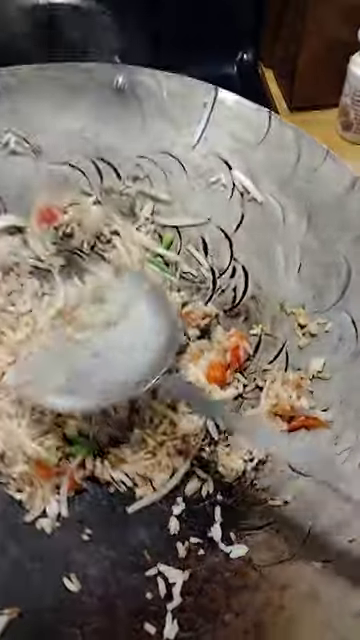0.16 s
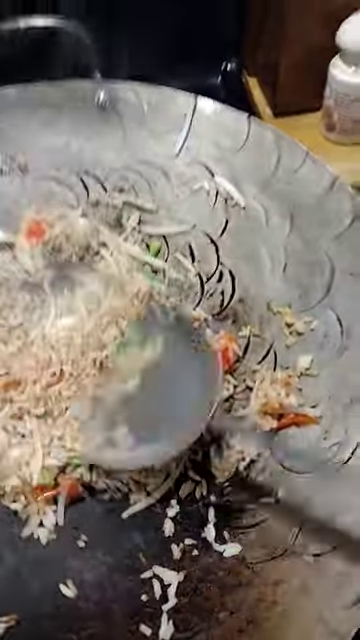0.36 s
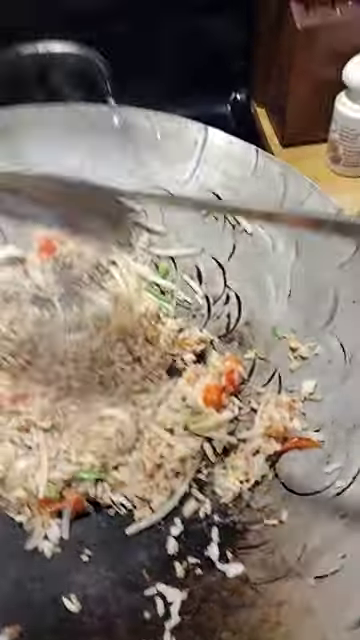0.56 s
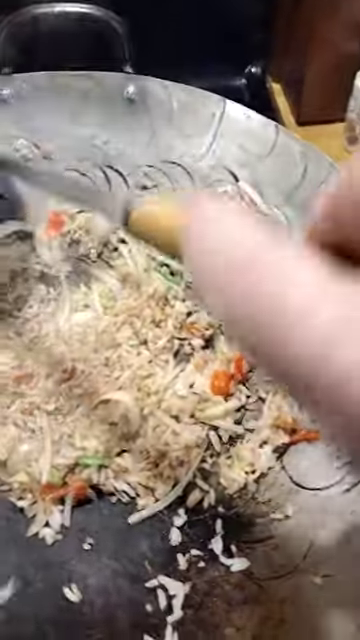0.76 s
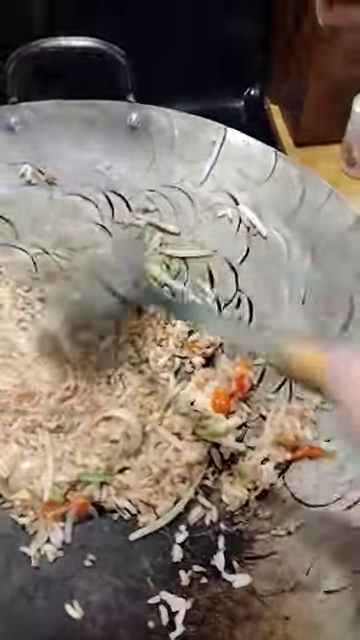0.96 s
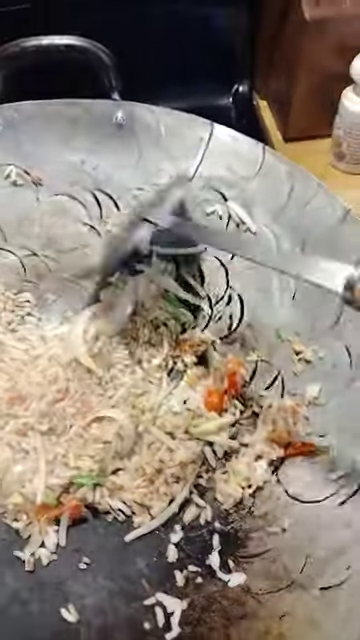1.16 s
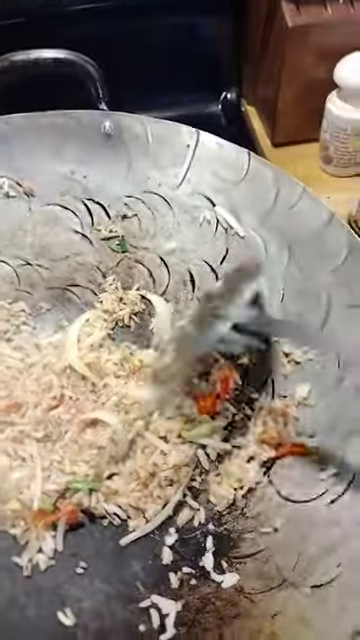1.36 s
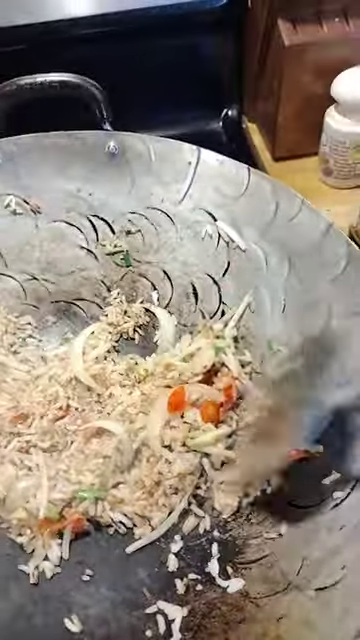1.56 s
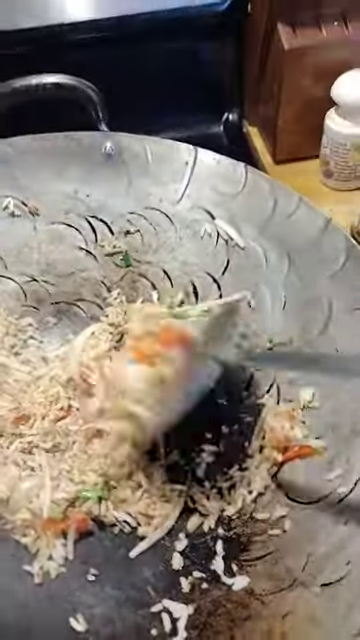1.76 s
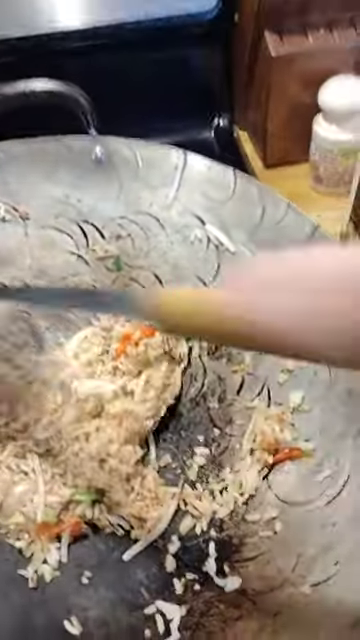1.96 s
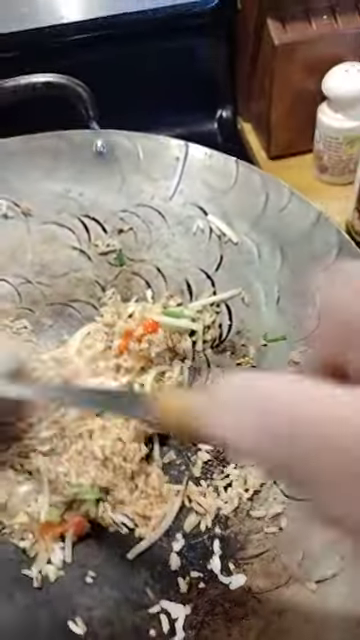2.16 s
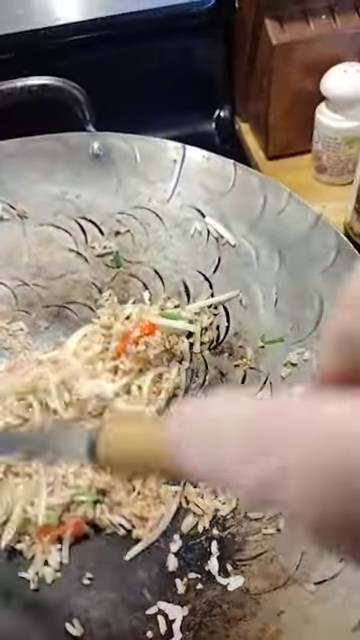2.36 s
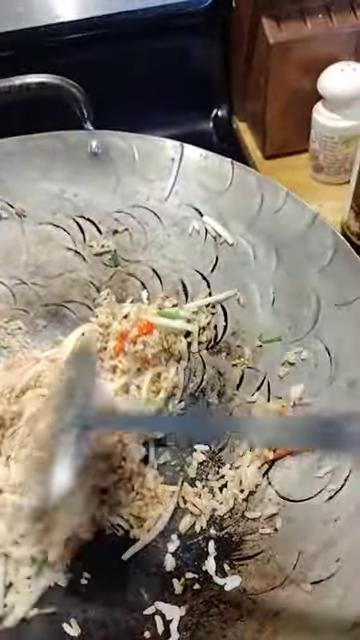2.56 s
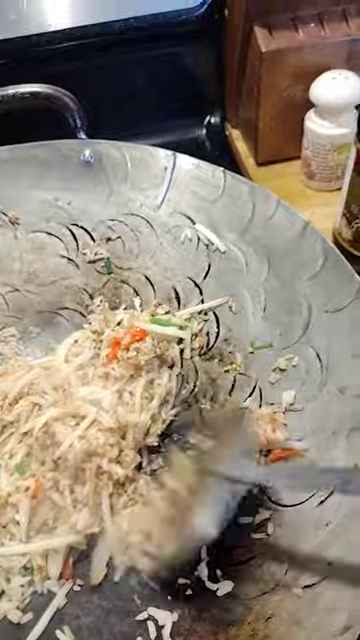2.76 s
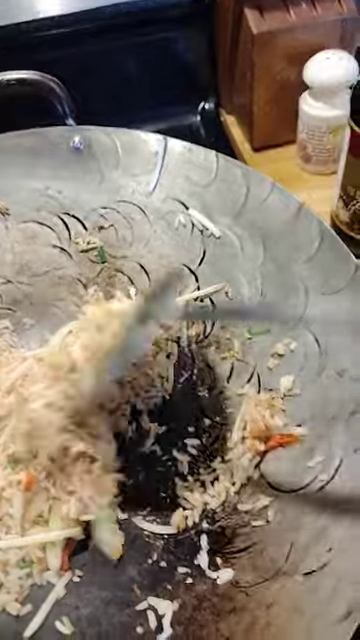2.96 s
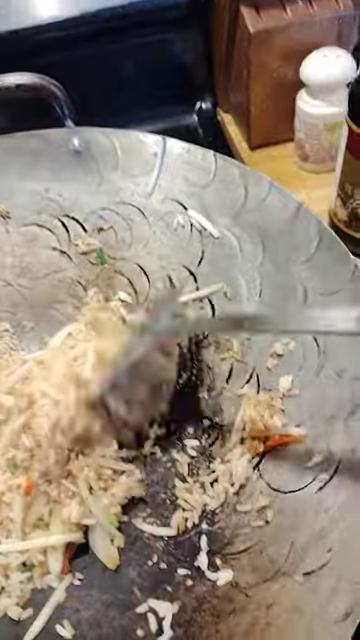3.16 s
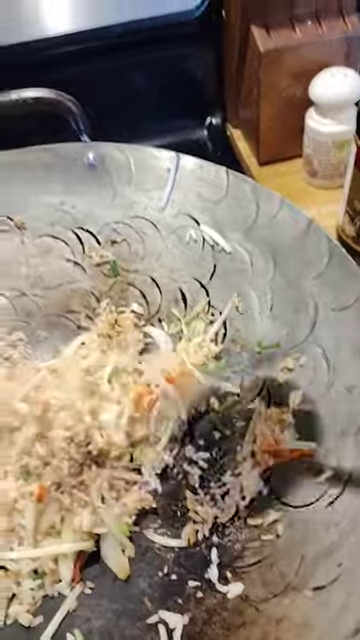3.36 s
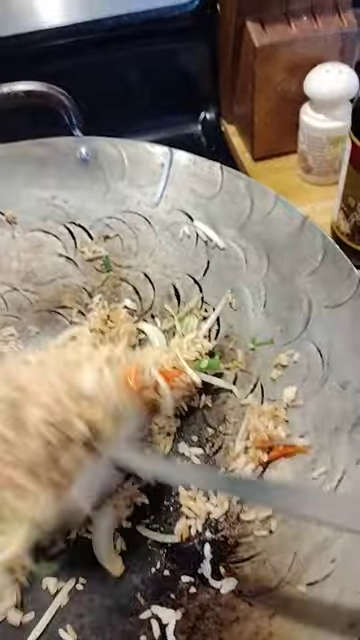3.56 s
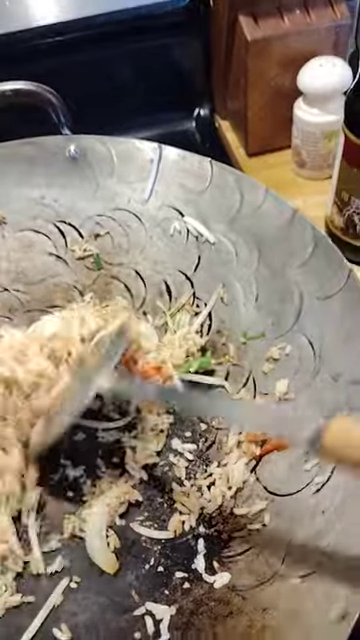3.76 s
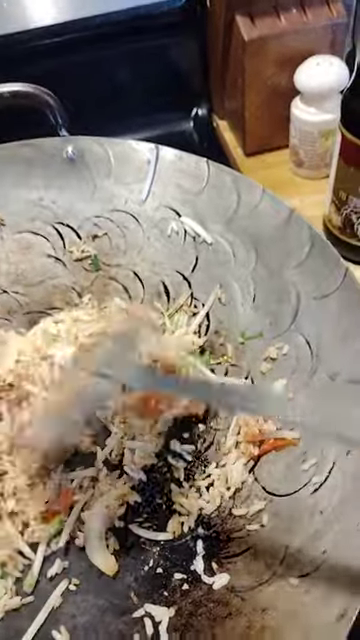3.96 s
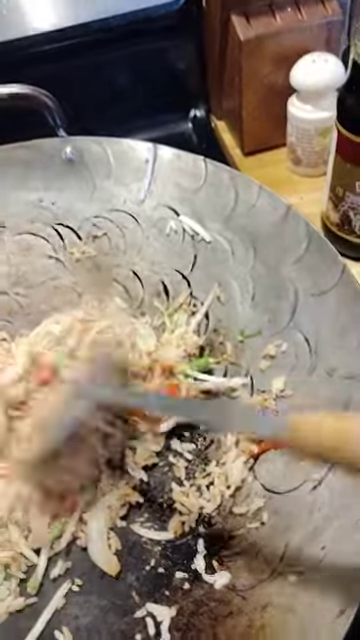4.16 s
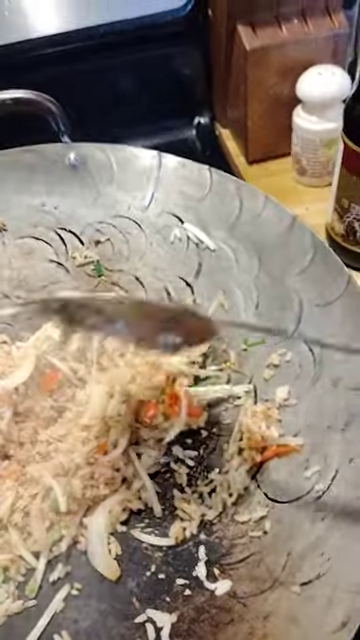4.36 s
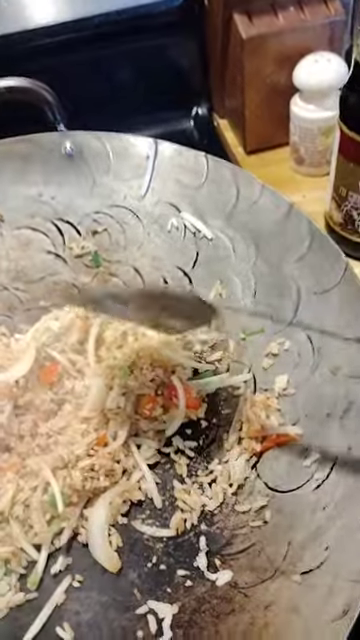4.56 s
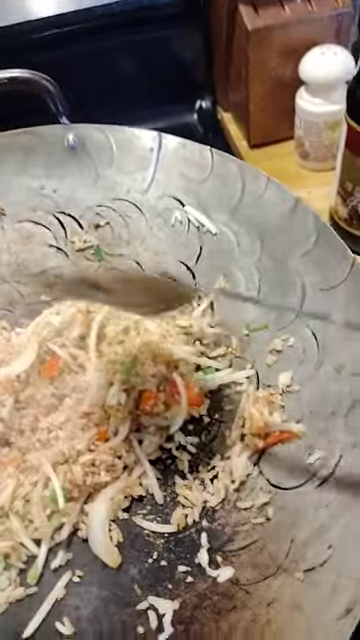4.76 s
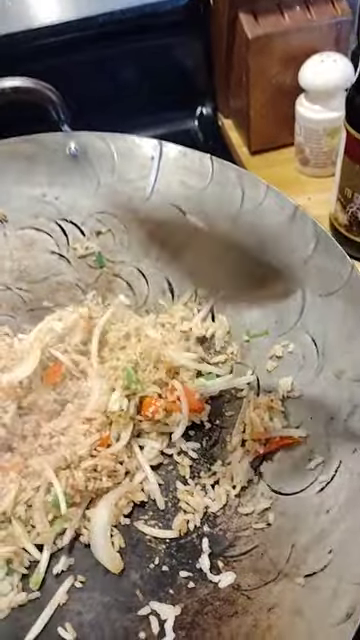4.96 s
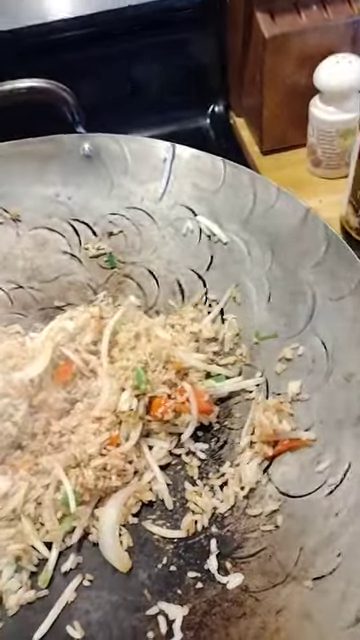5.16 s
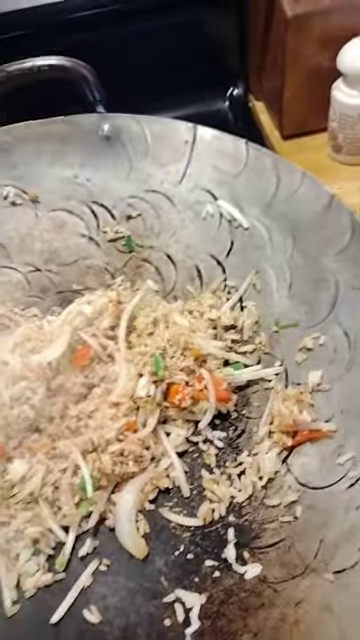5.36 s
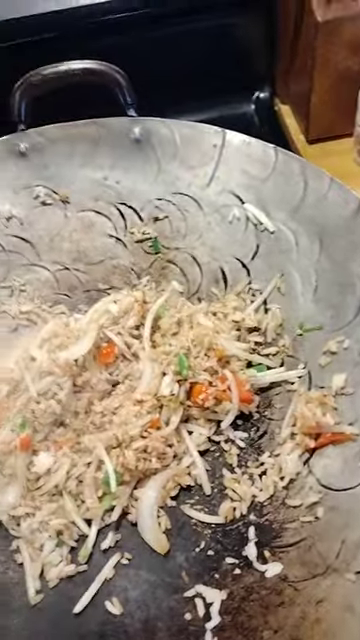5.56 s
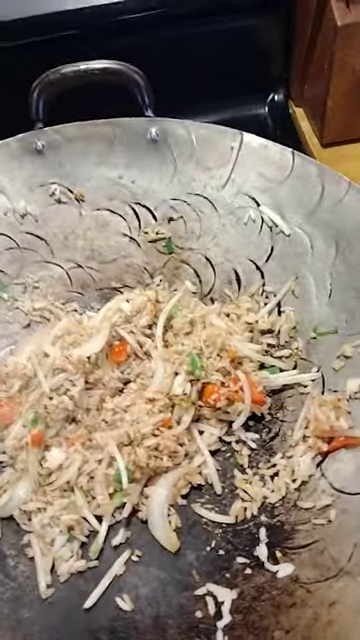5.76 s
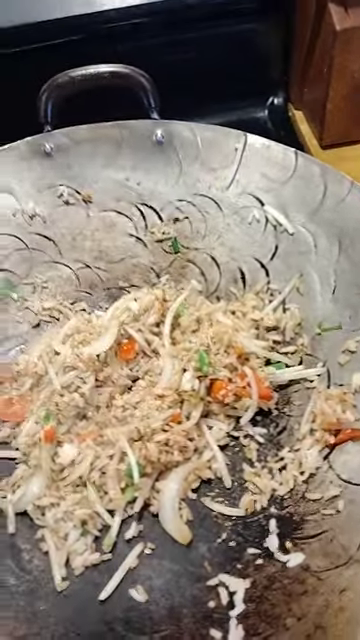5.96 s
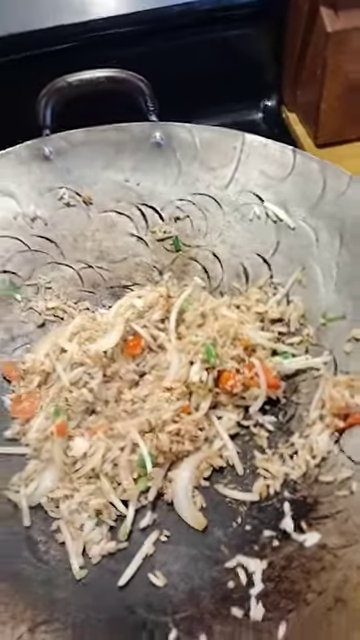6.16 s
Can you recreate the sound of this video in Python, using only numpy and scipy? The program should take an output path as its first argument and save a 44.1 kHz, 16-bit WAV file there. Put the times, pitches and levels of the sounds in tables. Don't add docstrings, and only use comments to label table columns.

```python
import sys
import numpy as np
from scipy import signal
from scipy.fft import rfft, irfft
from scipy.io import wavfile

SR = 44100
rng = np.random.default_rng(int(sys.argv[2]) if len(sys.argv) > 2 else 0)


def materialize(psi):
    bounded = np.clip(np.atleast_2d(psi).T, -1, 1)
    quanta = np.round(bounded * 32767).astype(np.int16)
    wavfile.write(sys.argv[1], SR, quanta)


def decibels_to_gain(level_db):
    exponent = np.asarray(level_db, float) / 20
    return 10 ** exponent


N = 277827

# (frequency [Hz], likeness [0-1])
PORT_LIKENESS = [(60, 0.93), (300, 0.96), (700, 0.2), (1400, 0.31), (2500, 0.13), (5000, 0), (15000, 0.061)]
# (time [s], fat left over right [dB], steel left over right [dB])
LEANS = [(0.0, -3.5, 3), (1.4, -4.5, 1.5), (2.65, -4, 4.5), (2.84, -4, 3), (4.3, -5.5, 1.5),
         (5.14, -2.5, 1.5), (5.53, -2, 13), (6.3, -8, 23)]
# (frequency [Hz], density [dB per Hz])
AIR_COLOUR = [(26, -43), (45, -20.5), (113, -9.5), (173, -13), (246, -6.5), (322, -13), (356, -12.5),
              (387, -16.5), (428, -14), (745, -25.5), (959, -26), (1060, -30), (2500, -31), (3250, -24.5),
              (5500, -120)]
# (frequency [Hz], width [Hz], level [dB])
HUM_MODES = [(114, 25, 3), (232, 22, -8.5)]
# (time [s], level [dB])
DRAUGHT = [(0, -39.5), (.6, -39.5), (1.9, -35.5), (4.4, -41), (4.7, -33.5), (5.05, -32.5), (5.58, -39),
           (5.98, -31), (6.3, -36.5)]
# (time [s], level [dB])
MOTOR = [(0, -33.5), (.6, -45.5), (2.1, -44), (3.0, -43), (3.4, -39), (4.44, -56), (4.67, -34),
         (5.05, -25.5), (5.3, -28), (5.6, -30.5), (6.3, -31.5)]
# (time [s], level [dB])
HEAT = [(0, -35), (.3, -25.5), (.6, -32), (.9, -31), (1.25, -29), (1.6, -30), (1.9, -28), (2.06, -33.5),
        (2.12, -36), (2.45, -30), (3.1, -31), (3.35, -30), (3.56, -38), (4.5, -34.5), (5.2, -35.5),
        (5.3, -42.5), (5.68, -48.5), (6.3, -56.5)]
# (peak time [s], rise [s], fall [s], fat [dB], steam [dB])
FLARES = [(.096, 0.092, 0.093, -19, -17), (.335, 0.0098, 0.073, -24, -17.5), (1.05, 0.066, 0.1, -20, -23.5),
          (1.383, 0.047, 0.053, -24, -22), (2.253, 0.07, 0.15, -24, -26), (2.495, .02, 0.28, -29, -32.5),
          (2.83, 0.0097, 0.14, -36, -33.5), (3.215, 0.026, .15, -42, -46), (3.62, 0.024, 0.35, -25, -28),
          (3.88, 0.069, 0.39, -23, -25.5), (4.196, 0.033, 0.21, -22, -23.5),
          (4.535, 0.026, 0.016, -29, -44), (4.71, 0.038, 0.025, -32.5, -33),
          (4.905, 0.029, 0.028, -26.5, -46)]
# (frequency [Hz], density [dB per Hz])
FIZZ_COLOUR = [(1500, -24), (2400, -12), (2900, -0.5), (3200, -2.5), (3600, -0.5), (4300, 0.5), (6000, 0.5),
               (9000, -1), (12000, -3.5), (15400, -1), (15900, -36)]
# (frequency [Hz], width [Hz], level [dB])
BOWL_AIR = [(2180, 485, 10), (2610, 950, 4.5), (1920, 160, 1.5)]
# (peak time [s], rise [s], fall [s], edge [dB], wok rumble [dB])
DRAGS = [(.096, 0.15, 0.14, -20.5, -32.5), (.335, 0.0083, 0.081, -21.5, -34), (.955, 0.03, 0.088, -31, -26),
         (1.04, 0.077, 0.073, -22, -49), (1.32, 0.052, 0.041, -20.5, -33), (1.384, 0.029, 0.039, -9.5, -31),
         (1.605, .03, .02, -39, -46), (1.71, 0.012, 0.066, -19.5, -35), (1.8, .1, 0.1, -33, -44.5),
         (2.165, 0.026, 0.057, -40, -30), (2.215, .02, 0.028, -18.5, -44), (2.27, .06, 0.1, -25, -43),
         (2.495, 0.013, 0.089, -20.5, -41), (2.832, 0.01, .08, -20.5, -45),
         (3.188, .02, 0.0092, -27.5, -45), (3.215, .02, 0.029, -21.5, -40), (3.33, .08, 0.08, -32, -46),
         (3.62, 0.017, 0.47, -39, -39.5), (3.88, 0.055, 0.5, -27, -39), (4.196, 0.037, 0.22, -24, -35.5),
         (4.535, 0.046, 0.099, -26, -35), (4.71, 0.076, 0.15, -26, -35),
         (4.905, 0.023, 0.093, -21.5, -29.5), (5.0, .05, 0.26, -35, -45)]
# (frequency [Hz], density [dB per Hz])
EDGE_RASP = [(2000, -50), (3150, -28), (3420, -2), (3750, 0), (4400, -1), (4900, -10), (5800, -16),
             (8000, -22), (12000, -40)]
# (frequency [Hz], density [dB per Hz])
WOK_RASP = [(150, -35), (300, -12), (450, -5), (650, -4), (900, 0), (1300, -1), (1600, -3), (2000, -9),
            (2600, -28), (4000, -60)]
# (frequency [Hz], width [Hz], level [dB])
LADLE_MODES = [(3080, 60, -16), (3490, 30, -3), (3565, 25, -6), (3640, 20, 0), (3740, 25, 0),
               (3890, 25, -2), (4000, 25, 2), (4100, 25, -4), (4340, 30, -4), (4400, 25, -2),
               (4800, 40, -8), (5130, 20, -3), (5480, 25, -7), (5850, 25, -6), (6100, 60, -14),
               (6460, 20, -9), (6780, 30, -12), (7260, 30, -16), (7730, 30, -16), (8220, 50, -14),
               (8700, 30, -16)]
# (frequency [Hz], width [Hz], level [dB])
WOK_MODES = [(436, 40, -6), (575, 30, -7), (660, 30, -6), (821, 40, -1), (930, 25, 0), (1118, 25, -3),
             (1300, 20, -1), (1480, 30, -3), (1690, 30, -5), (1900, 50, -5), (2180, 60, -3)]
# (time [s], lift of the upper half of the ladle's band and equal drop of the
# lower [dB], high modes [dB])
LIP = [(0, 0, -7), (.92, 0, -3), (.99, -1, -5), (1.04, 2, 9), (1.27, 6, -2), (1.33, -2, -2),
       (1.38, -2.5, 2), (1.62, 1.5, -6), (1.72, -2.5, 3), (2.14, -1.5, -6), (2.22, 0.5, 2), (2.47, 4.5, -2),
       (2.83, -3.5, -9), (3.19, 2, -4), (3.9, 1, 0), (4.51, -4, 5), (4.67, 0.5, 0), (4.88, -2, 8),
       (5.1, 1, -2)]
# (time [s], peak [dB], low part [dB], left over right [dB])
POPS = [(0.198, -10, -9, -3), (0.2153, -20, -5, -5.5), (0.331, -15, 9, -15), (0.519, -27, -9, -1),
        (0.548, -33, -12, -3), (0.562, -28, -15, -5), (0.796, -13, -11, -9), (0.806, -20, 5, -3),
        (0.824, -20, -3, -4), (0.8967, -25, 2, -3.5), (1.4118, -17, -8, 5), (1.996, -18, -8, -7),
        (2.0108, -11, -8, -6), (2.2047, -21, -9, -2), (2.978, -23, 7, 0), (2.593, -16.5, 10.5, 6),
        (3.4183, -9, -36, -6), (3.551, -14, -20, -10), (3.607, -17, -6, 3), (4.067, -16, 3, -5),
        (4.153, -24, 17, -14.5), (5.029, -13, -12, -9), (5.273, -14.5, -5, 0), (5.301, -25, 6, -16),
        (5.535, -25.5, 4, -9), (5.613, -36, 2, -4), (5.6334, -37, 12, -3), (5.6929, -18, -2, -8),
        (5.99, -22, 8, -3), (6.1544, -45, -11, -2), (6.2241, -28, 8, -2), (6.252, -29, 1, 3)]
# (time [s], level [dB], pitch [Hz], length [cycles])
CHIMES = [(0.925, -1, 1500, 0.83), (0.929, -8, 3730, 23), (0.989, -17, 3860, 25), (1.345, -30.5, 592, 16),
          (1.6212, -6, 3800, 1.6), (1.72, -27, 418, 7.1), (2.146, -13, 3940, 14), (2.189, -21.5, 445, 5.8),
          (2.472, -11, 1310, 1.2), (3.197, -15, 2180, 22), (4.506, -17, 677, 2), (4.545, -26, 860, 5),
          (4.66, -10, 650, 0.76), (4.857, -31, 930, 9.9), (4.874, -7, 666.7, 0.68), (4.93, -21, 510, 7),
          (5.757, -17, 1670, 5), (5.758, -25, 155, 7.1), (5.76, -30, 3080, 18), (5.762, -24, 294, 4.8),
          (7.1, -18, 1680, 4), (5.822, -30, 1700, 20), (5.832, -24, 3080, 17), (5.9325, -10, 1500, 1.2),
          (5.936, -31.5, 3010, 23), (5.938, -26, 545, 9), (5.958, -24, 1120, 2.5), (5.981, -20, 1300, 1.5),
          (5.99, -17, 1800, 1.2), (5.992, -23, 487, 6), (6.0, -14, 1110, 2.5), (6.01, -22.5, 155, 3.6),
          (6.012, -18, 436, 14.5), (6.013, -18, 2200, 9.2), (6.021, -21, 1400, 1.5),
          (6.036, -18.5, 525, 7.7), (6.037, -15, 1100, 2.5), (6.055, -25, 1120, 3.5),
          (6.095, -20, 1110, 7.1), (6.12, -27, 690, 5)]
# (time [s], thud [dB], thud pitch [Hz], ladle ring [dB], crack over the ring [dB])
KNOCKS = [(0.926, 0, 870, -2, -19), (0.987, 5.5, 1970, -7.5, -18), (1.271, 7, 1840, -6.5, -3),
          (1.6206, 7.5, 2040, -4.5, -5), (2.1419, -5, 434, -8, -21), (2.147, -4.5, 810, -11, -14),
          (2.213, -24, 2160, -18.5, 0), (2.471, 2, 1960, -2, -8.5), (3.192, 6.5, 2070, -5.5, -5.5),
          (4.511, -9, 676, -3.5, -7), (4.666, -7, 666, -4.5, -3.5), (4.694, -8, 660, -10, -9),
          (4.879, -5.5, 770, -3, -6)]
# (frequency [Hz], density [dB per Hz])
CRACK_COLOUR = [(880, -67), (1500, -20), (2190, -1.5), (2860, -11), (4040, 5.5), (5170, -6), (6630, -1.5),
                (9470, -10), (16000, -13)]
# (time [s], peak [dB], pitch [Hz], low boom [dB], t60 [s])
BOUNCES = [(5.744, -25, 433, -8, 0.047), (5.7559, -11.5, 2220, -3, 0.047), (5.775, -31, 265, -16, 0.05),
           (5.8, -14.5, 2190, -10, 0.048), (5.826, -21.5, 1650, -1, 0.066),
           (5.9332, -12.5, 560, -20, 0.063), (5.976, -12.5, 946, -7, 0.064), (5.989, -23, 523, -3, 0.096),
           (6.002, -36, 428, 16, 0.045), (6.009, -17, 436, -12, 0.15), (6.034, -16.5, 464, -18, 0.063),
           (6.072, -16, 1110, -22, 0.088)]
# (time [s], level [dB])
SLIDES = [
    [(5.73, -81), (5.754, -21), (5.84, -37), (5.88, -43)],
    [(5.932, -16.5), (5.962, -22), (6.012, -13), (6.096, -28), (6.2, -45)],
]
# (frequency [Hz], width [Hz], level [dB])
COUNTER_MODES = [(155, 50, -18), (280, 21, -0.5), (436, 14, 3.5), (569, 26, 8), (736, 180, -12),
                 (1110, 210, 16), (1580, 110, -21), (1700, 63, -2), (2220, 200, 2.5), (3080, 80, -24)]
# (frequency [Hz], density [dB per Hz])
WOOD_RASP = [(100, -20), (160, -45), (450, 5), (800, 3), (1150, 1), (2100, -1.5), (2800, -11), (4500, -17),
             (8000, -39), (11000, -55)]

STEAM_REST_DB, EDGE_REST_DB, BELLY_REST_DB = -6, -13, -21
SWING_DB = 12
ROUND = 0.17
STEAM_STEEP, BELLY_STEEP = 1.22, 0.92
DUCK_DB, DUCK_S = -1, 0.11
MIST_DB, MIST_HZ, MIST_FOLLOW = -21.5, 6700, 0.52
LIP_SPLIT_HZ, LIP_HIGH_HZ = 3980, 4840
WOK_RING_DB, WOK_PER_CRACK = -8.5, -0.56
JOLT_TIMES_S, JOLT_DB, JOLT_HZ = (4.664, 4.878), -30., 36.


def evened(x):
    return x / np.sqrt(np.mean(x ** 2) + 1e-20)


def read(points, hz):
    f, value = np.transpose(points)
    return np.interp(np.log(hz + 1), np.log(f + 1), value)


def curve(rows, column):
    rows = np.asarray(rows)
    return np.interp(np.arange(N) / SR, rows[:, 0], rows[:, column])


def add(mix, s, sound):
    part = mix[:, round(s * SR):][:, :sound.shape[1]]
    part += sound[:, :part.shape[1]]


def panned(x, lean_db):
    return x * np.array([decibels_to_gain(lean_db / 2), decibels_to_gain(-lean_db / 2)]).reshape(2, -1)


def ports(a, b):
    same = np.clip(read(PORT_LIKENESS, np.fft.rfftfreq(len(a), 1 / SR)), 0, 1)
    second = same * rfft(a) + np.sqrt(1 - same ** 2) * rfft(b)
    return np.array([a, irfft(second, len(a))])


def noise(size):
    return ports(*rng.standard_normal((2, size)))


def coloured(x, gain):
    return irfft(rfft(x) * gain(np.fft.rfftfreq(x.shape[-1], 1 / SR)), x.shape[-1])


def shaped(x, points):
    return evened(coloured(x, lambda hz: decibels_to_gain(read(points, hz))))


def humps(modes):
    return lambda hz: np.sqrt(sum(decibels_to_gain(2 * db) / (1 + (2 * (hz - f) / w) ** 2) ** 2 for f, w, db in modes))


def flicker(hz, depth_db):
    rate = 400
    steps = rng.standard_normal(int(N / SR * rate) + 2)
    steps = evened(signal.lfilter([1], [1, -np.exp(-hz / 60)], steps))
    return decibels_to_gain(depth_db * np.interp(np.arange(N) / SR * rate, np.arange(len(steps)), steps))


def fan():
    air = shaped(noise(N), AIR_COLOUR)
    hum = evened(coloured(noise(N), humps(HUM_MODES)))
    rush = decibels_to_gain(curve(DRAUGHT, 1) - 4.5) * air * flicker(23.0, 0.49)
    return rush + decibels_to_gain(curve(MOTOR, 1) - 11.0) * hum


def grains(per_s, spread_db):
    size = decibels_to_gain(spread_db * np.minimum(rng.exponential(1, N), 5)) * rng.choice([-1., 1.], N)
    return size * (rng.random(N) < per_s / SR)


def stirred(rows, column, rest_db, steep=1):
    rows = np.asarray(rows).T[:, :, None]
    t = np.arange(0, N + 64, 64) / SR
    peak, rise, fall = rows[:3]
    before = (peak - t) / abs(rise)
    after = np.hypot((t - peak) / fall, ROUND) * (t > peak) - ROUND
    away = np.maximum(before, after).clip(0)
    power = decibels_to_gain(2 * (rows[column] - steep * SWING_DB * away)).sum(0)
    strokes = np.interp(np.arange(N) / SR, t, power)
    return np.sqrt(strokes + decibels_to_gain(2 * (curve(HEAT, column=1) + rest_db)))


def covered():
    since = np.arange(N) / SR - np.transpose(KNOCKS)[0][:, None]
    return decibels_to_gain(DUCK_DB * (np.exp(-abs(since) / DUCK_S) * (since > 0)).max(0))


def fat():
    fizz = ports(grains(9000., 3.), grains(9000., 3.)) * flicker(45., 1.2)
    gain = decibels_to_gain(4.0) * stirred(FLARES, column=3, rest_db=-3.5) * covered()
    return gain * panned(shaped(fizz, FIZZ_COLOUR), curve(LEANS, 1))


def steam():
    puffs = ports(grains(3000., 3.3), grains(3000., 1.0)) * flicker(50., 0.46)
    bowl = panned(evened(coloured(puffs, humps(BOWL_AIR))), curve(LEANS, 2))
    return stirred(FLARES, column=4, rest_db=STEAM_REST_DB, steep=STEAM_STEEP) * covered() * bowl


def mist():
    decay = decibels_to_gain(-60 * np.arange(600) / SR / .012)
    bursts = signal.oaconvolve(abs(grains(220., 3.)), decay)[:N]
    ticks = coloured(bursts * rng.standard_normal((2, N)),
                     lambda hz: 1 / np.hypot(1, (MIST_HZ / (hz + 1)) ** 2))
    return decibels_to_gain(MIST_DB + MIST_FOLLOW * curve(HEAT, column=1)) * panned(evened(ticks), -9.5)


def ring(modes, t60, scatter_db, size=12000):
    t = np.arange(size) / SR
    hz, width, db = np.transpose(modes)[:, :, None]
    luck = rng.standard_normal((3, len(modes), 1))
    decay_db = 60 * t * (1 / t60 + 0.18 * width)
    fall = decibels_to_gain(db + scatter_db * luck[0] - decay_db) * np.minimum(t * hz, 1)
    a, b = ((fall * np.sin(2 * np.pi * hz * t + 3 * p)).sum(0) for p in luck[1:])
    return ports(a, b) / abs(a).max()


def rubbed(modes, rasp, per_s, spread_db, t60, modes_db):
    blows = grains(per_s, spread_db) * flicker(53.0, 0.31)
    smear = noise(300) * decibels_to_gain(-60 * np.arange(300) / SR / .004)
    broad = shaped(signal.oaconvolve(blows[None], smear, axes=1)[:, :N], rasp)
    tones = evened(signal.oaconvolve(blows[None], ring(modes, t60, 0.21), axes=1)[:, :N])
    return evened(broad + decibels_to_gain(modes_db) * tones)


def above(hz, edge_hz):
    return 1 / (1 + np.exp(np.clip((edge_hz - hz) / 90, -50, 50)))


def turning(x):
    upper = coloured(x, lambda hz: above(hz, LIP_SPLIT_HZ))
    high = coloured(x, lambda hz: above(hz, LIP_HIGH_HZ))
    half = decibels_to_gain(curve(LIP, column=1))
    return (x - upper) / half + (upper - high) * half + high * decibels_to_gain(curve(LIP, column=2) - 0.5)


def scrape():
    ladle = rubbed(LADLE_MODES, EDGE_RASP, 4000., 2.5, .08, -9.)
    wok = rubbed(WOK_MODES, WOK_RASP, 1200., 3., .06, -6.)
    edge = stirred(DRAGS, column=3, rest_db=EDGE_REST_DB)
    fizz = stirred(FLARES, column=3, rest_db=0)
    free = np.sqrt(np.maximum(edge ** 2 - decibels_to_gain(-10.) * fizz ** 2, 0))
    rumble = stirred(DRAGS, column=4, rest_db=BELLY_REST_DB, steep=BELLY_STEEP) * wok
    return decibels_to_gain(0.5) * (free * panned(turning(ladle), curve(LEANS, 2)) + rumble)


def thud(hz, cycles):
    t = np.arange(12000) / SR
    build = np.minimum(t / 0.00084, 1) ** 2
    return np.sin(2 * np.pi * hz * t) * np.exp(-t * hz / cycles) * build * np.ones((2, 1))


def pop(db, low_db, lean_db):
    t = np.arange(12000) / SR

    def band(hz):
        return 1 / np.hypot(1, (2300.0 / (hz + 1)) ** 2) / np.hypot(1, (hz / 13000.0) ** 2)

    spit = coloured(noise(len(t)), band) * decibels_to_gain(2.5 - 60 * t / 0.0052)
    return panned(decibels_to_gain(db) * (spit + decibels_to_gain(low_db) * thud(2240.0, 2.14)), np.clip(lean_db, -6, 6))


def chime(db, hz, cycles):
    return decibels_to_gain(db) * thud(hz, cycles)


def tipped(s):
    at, half_db, high_db = np.transpose(LIP)
    half_db, high_db = np.interp(s, at, half_db), np.interp(s, at, high_db)

    def shift_db(f):
        upper, high = above(f, LIP_SPLIT_HZ), above(f, LIP_HIGH_HZ)
        return -half_db + 2 * half_db * upper + (high_db - half_db) * high

    return [(f, w, db + shift_db(f)) for f, w, db in LADLE_MODES]


def knock(s, db, hz, ladle_db, bright_db):
    t = np.arange(12000) / SR
    crack = shaped(noise(len(t)), CRACK_COLOUR) * decibels_to_gain(ladle_db + bright_db - 60 * t / 0.1)
    wok_db = ladle_db + WOK_RING_DB + WOK_PER_CRACK * bright_db
    ladle = decibels_to_gain(ladle_db) * ring(tipped(s), 0.18, 3.5)
    wok = decibels_to_gain(wok_db) * ring(WOK_MODES, 0.036, 6.3)
    swell = np.minimum(t / 0.0021, 1) ** 2
    return decibels_to_gain(db + 2.5) * thud(hz, 0.87) + (ladle + wok + crack) * swell


def jolt():
    return decibels_to_gain(JOLT_DB) * thud(JOLT_HZ, 1)


def bounce(db, hz, boom_db, t60):
    boom = decibels_to_gain(boom_db) * ring(COUNTER_MODES, 1.03 * t60, 8.1)
    return decibels_to_gain(db) * (thud(hz, t60 * hz / 20) + boom)


def counter_slide():
    rows = [(5.7, -96)] + list(SLIDES[0]) + [(5.925, -56)] + list(SLIDES[1]) + [(6.25, -90)]
    slide = rubbed(COUNTER_MODES, WOOD_RASP, 1100., 3.5, .07, -5.)
    return decibels_to_gain(curve(rows, 1) - 3.5) * panned(slide, 1.9)


def kitchen(x, t60):
    t = np.arange(16000) / SR
    hits = rng.choice([-1., 1.], (2, len(t))) * (rng.random((2, len(t))) < .05)
    taps = hits * decibels_to_gain(-60 * t / t60) * (t > .003)
    return signal.oaconvolve(x, taps / np.linalg.norm(taps[0]), axes=1)[:, :N]


def scene():
    blows = np.zeros((2, N))
    for s, *row in POPS:
        add(blows, s, pop(*row))
    for s, *row in CHIMES:
        add(blows, s, chime(*row))
    for s, *row in KNOCKS:
        add(blows, s, knock(s, *row))
    for s in JOLT_TIMES_S:
        add(blows, s, jolt())
    for s, *row in BOUNCES:
        add(blows, s, bounce(*row))
    blows += counter_slide()
    room = decibels_to_gain(-9.) * kitchen(blows, .22)
    return fan() + fat() + steam() + mist() + scrape() + blows + room


def top_cut(x):
    return signal.sosfilt(signal.butter(12, 16440, fs=SR, output="sos"), x)


def record(dry):
    thin = coloured(dry, lambda hz: 1 / np.sqrt(1 + (69.0 / (hz + 1)) ** 4))
    held = 1.1 * np.tanh(thin / 1.1)
    finished = coloured(held, lambda hz: decibels_to_gain(-np.clip((hz - 15480) / 14, 0, 70)))
    return top_cut(finished)


dry = scene()
out = record(dry)
materialize(out)
```